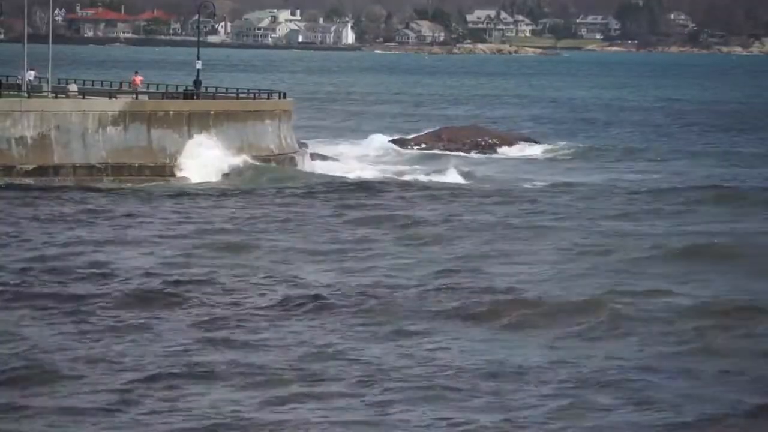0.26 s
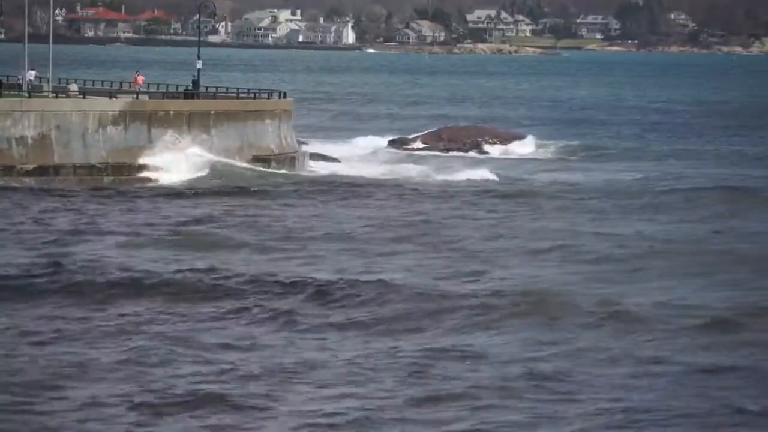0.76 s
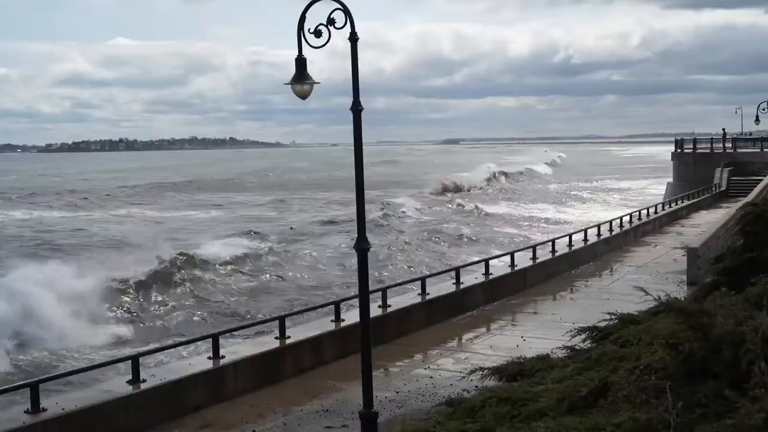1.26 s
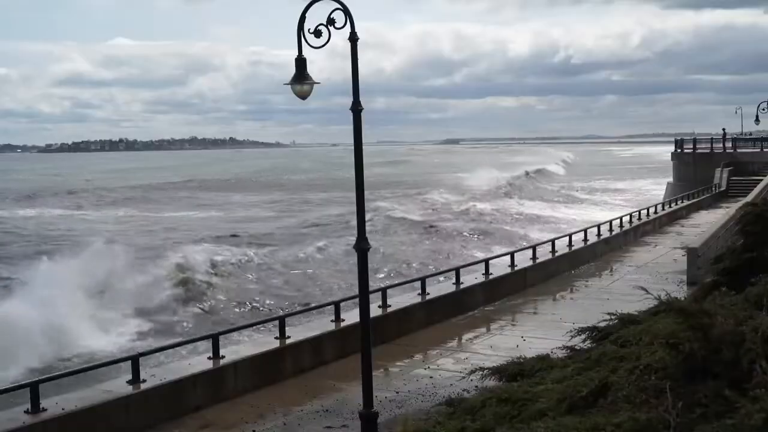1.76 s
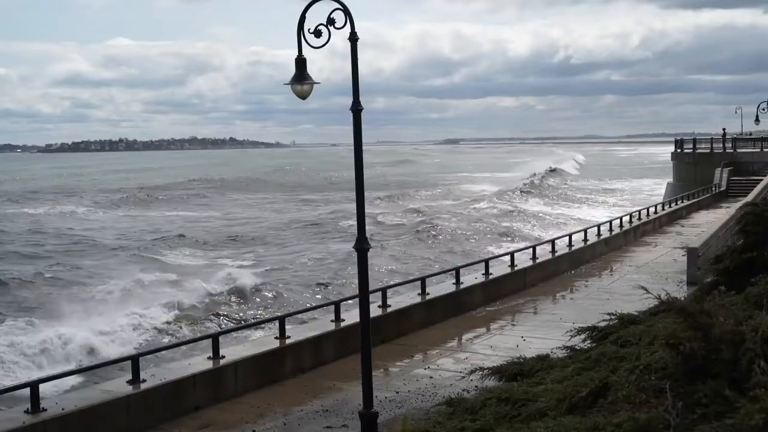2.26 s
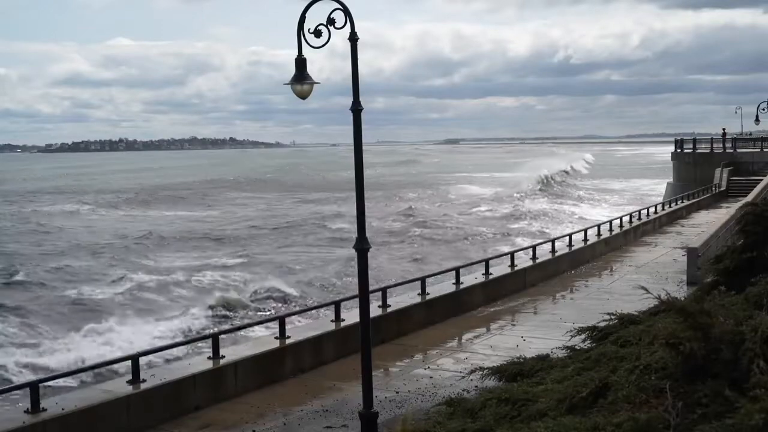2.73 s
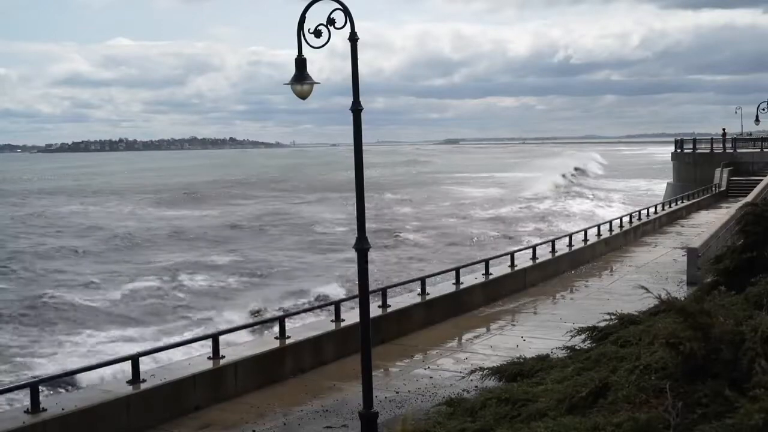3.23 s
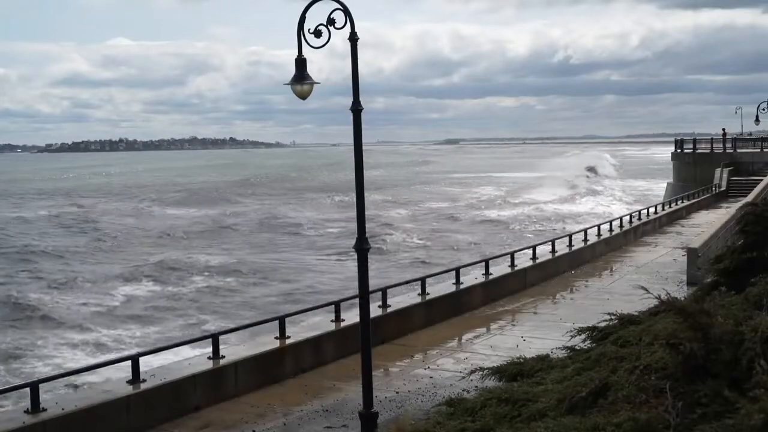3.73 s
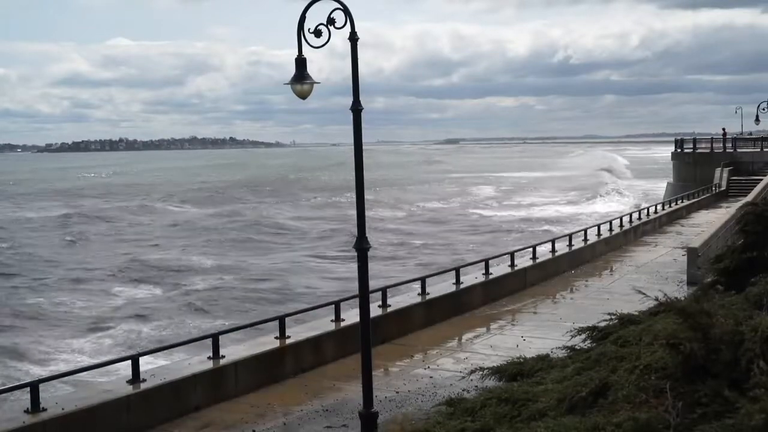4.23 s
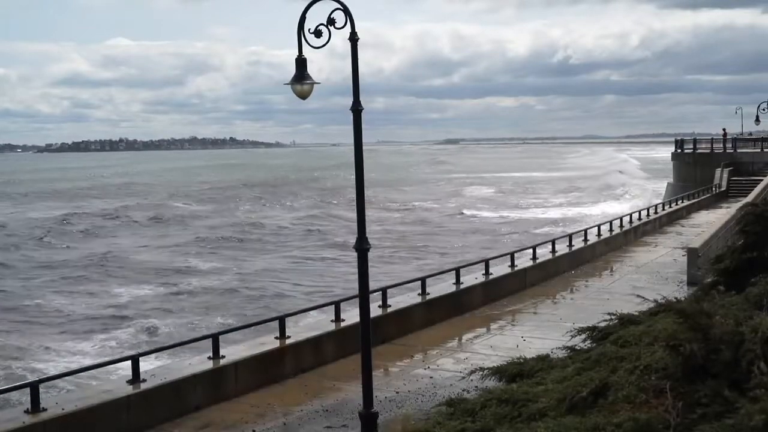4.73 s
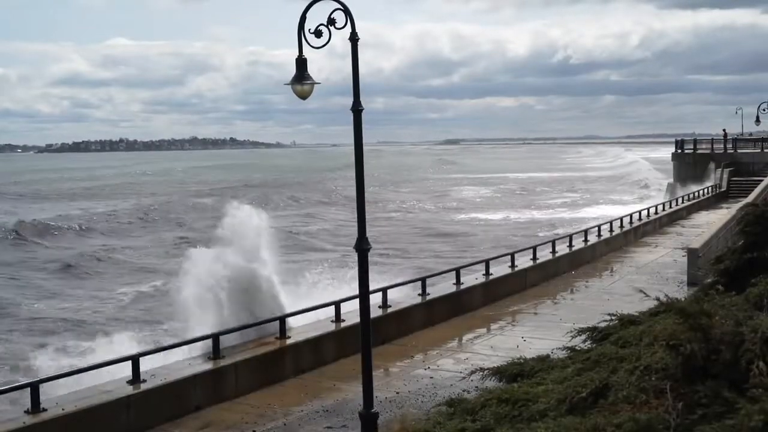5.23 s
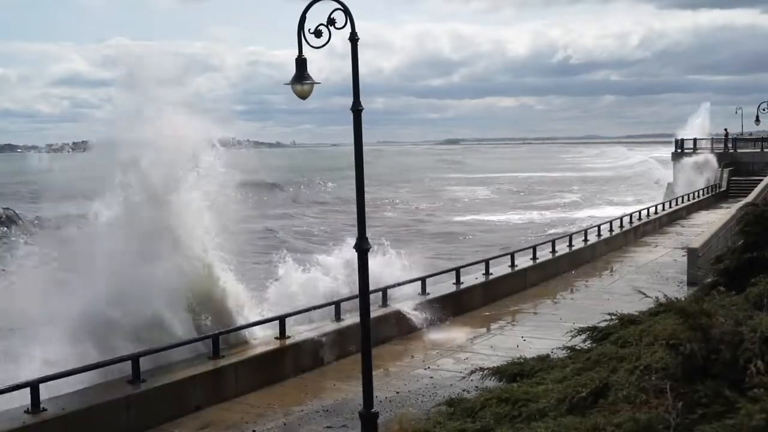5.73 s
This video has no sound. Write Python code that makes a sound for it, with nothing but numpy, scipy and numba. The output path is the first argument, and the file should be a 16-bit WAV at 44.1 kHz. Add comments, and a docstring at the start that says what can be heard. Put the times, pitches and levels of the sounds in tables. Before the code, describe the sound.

Distant breakers give way abruptly to close waves slamming a sea wall and washing back, with wind thumping on the microphone.

```python
"""Storm surf on a concrete sea wall, heard first from far off, then abruptly from beside the wall,
where a wave bursts, rains back and drains before the next one hits. Clouds of trapped air roar,
foam fizzes and spray patters. A distant motor and tyres on the shore road hum behind the backwash.
Gusts buffet the microphone and drive its limiter, so the sea ducks under the biggest swings."""
import sys
import numpy as np
from scipy import signal
from scipy.fft import rfft, irfft, next_fast_len
from scipy.io import wavfile
from scipy.ndimage import uniform_filter1d, map_coordinates
from numba import njit

SR = 44100
rng = np.random.default_rng(int(sys.argv[2]) if len(sys.argv) > 2 else 0)


def store_wav(level_fs):
    """Save 16-bit WAV to argv[1]."""
    pcm = np.round(np.clip(np.atleast_2d(level_fs), -1, 1) * 32767)
    wavfile.write(sys.argv[1], SR, pcm.T.astype(np.int16))


N = 264159
TIME = np.arange(N) / SR

# The four voices of white water, low to high. Each row: frequency in Hz, relative level in dB.
ROAR_SPECTRUM = [(120, -12), (280, -3), (500, 4), (750, 0), (1100, -8.5), (1600, -11.5), (2500, -18.5),
                 (5000, -79)]
FOAM_SPECTRUM = [(400, -5), (1000, 4.5), (1700, -1), (2500, 0), (3500, -2.5), (4500, -9), (6500, -19),
                 (12000, -29)]
SPRAY_SPECTRUM = [(2500, -2.5), (4500, 1.5), (6500, 0.5), (9500, -4), (12500, -13), (16000, -31)]
MIST_SPECTRUM = [(5000, -22), (9000, -1), (12000, -1.5), (14000, 0), (16000, -12)]

def surf():
    """Air trapped by the breakers roars; foam fizzes as it bursts; thrown spray hisses back down."""
    roar_db, foam_db = wash_db("roar"), wash_db("foam")
    spray_db = wash_db("spray", fall_s=0.24)  # spray settles sooner than foam
    slosh = walk(21.55)  # sheets of water land unevenly and move roar, foam and spray together
    roar = noise() + 0.62 * bubbles(200, 2223, cycles=12.6, spread_db=1.5, count=7000)
    roar = colour(roar, ROAR_SPECTRUM)
    foam = noise() + 0.42 * bubbles(810, 6720, cycles=12, spread_db=2, count=24000)
    foam = colour(foam, FOAM_SPECTRUM)
    spray = noise() + 0.5 * bubbles(4600, 11800, cycles=5.1, spread_db=-1, count=26000)
    spray = colour(spray, SPRAY_SPECTRUM)
    # the finest hiss only carries when the spray is dense and near
    mist_db = spray_db - 11.5 + np.interp(spray_db, [-60, -46.5], [-9, 0])
    return (roar * undb(roar_db + 0.18 * slosh + 0.31 * walk(35))
            + foam * undb(foam_db + 0.34 * slosh + 0.4 * walk(60))
            + spray * undb(spray_db + 0.31 * slosh + 0.38 * walk(80))
            + colour(noise(), MIST_SPECTRUM) * undb(mist_db))


# One far breaker, then the surges of two waves at the wall. Each row: time of full strength,
# hold and rise in seconds, then the levels of roar, foam and spray in dB.
SURGES = [(0.49, 0.79, .4, -37, -43.5, -54.5), (1.286, 0.42, .05, -35, -32, -45.5),
          (1.957, 0.34, 0.22, -32, -28.5, -39), (2.25, 0.36, .1, -37.5, -35.5, -45),
          (2.89, 0.69, 0.3, -33, -38.5, -51.5), (3.756, 0.13, .1, -38, -42, -66),
          (4.573, 0.11, .06, -35.5, -40, -59.5), (4.93, 0.11, .05, -37, -41.5, -65),
          (5.25, 0.26, 0.091, -40.5, -41.5, -48.5), (5.966, .1, 0.18, -56, -42, -44.5)]
FAR_WASH_DB, NEAR_WASH_DB = (-37, -46, -54.5), (-37, -42, -59)  # steady roar, foam, spray
CLOSE_S = 1.289  # from here on the microphone is beside the wall

def wash_db(layer, fall_s=0.28):
    """Level of one layer of surf: the surges in earshot swell and die away over a steady wash."""
    column = ("roar", "foam", "spray").index(layer)
    surges = [(start, hold, rise, levels[column]) for start, hold, rise, *levels in SURGES]
    far = summed_db(FAR_WASH_DB[column], surges[:1], fall_s)
    near = summed_db(NEAR_WASH_DB[column], surges[1:], fall_s)
    return np.where(TIME < CLOSE_S, far, near)


# Slabs of water landing on the wall, close by.
# Each row: start in seconds, level in dB, pitch of the trapped air in Hz, decay in seconds.
SLAMS = [(1.291, -20.5, 426, 0.043), (1.925, -22, 169, 0.038), (2.17, -28, 487, 0.096),
         (2.25, -26.5, 460, 0.079), (4.9, -29.5, 844, 0.076)]

def slams():
    """A falling slab traps a pocket of air, which booms briefly."""
    out = np.zeros(N)
    for start, db, hz, decay in SLAMS:
        age = np.maximum(TIME - start, 0)
        pocket = unit(resonate(resonate(noise(), hz, 0.75 * hz), hz, hz))
        attack = 1 - np.exp(-age / 0.0047)
        out += undb(db) * pocket * attack * np.exp(-age / decay)
    return out


# The low end of the sea at the wall. Each row: frequency in Hz, relative level in dB.
RUMBLE_SPECTRUM = [(25, -19), (50, -5.5), (78, 5), (110, 0.5), (170, 0), (250, -3), (400, -12.5),
                   (900, -53)]

def swell():
    """The mass of water heaving against the wall rumbles, more as the breakers roar."""
    excess_roar_db = wash_db("roar") + 32
    return colour(noise(), RUMBLE_SPECTRUM) * undb(-28.5 + 0.39 * excess_roar_db)


# Two faint, bright ticks, then a sharp click where the sound cuts abruptly to beside the wall.
# Each row: start in seconds, peak level in dB, pitch in Hz, bandwidth in Hz.
TICKS = [(.629, -35, 9500, 4000), (0.936, -34, 6500, 4000), (1.29, -16.5, 3960, 10100)]

def ticks():
    """Each is one short, bright burst of noise."""
    out = np.zeros(N)
    for start, db, hz, width in TICKS:
        age = np.maximum(TIME - start, 0)
        burst = noise() * (age > 0) * np.exp(-age / 0.00076)
        tick = resonate(resonate(burst, hz, width), hz, width)
        out += undb(db) * tick / np.abs(tick).max()
    return out


# Wind on the microphone itself. Each row: frequency in Hz, relative level in dB.
BUFFET_SPECTRUM = [(8, -11), (20, 2), (35, -1), (60, -7), (90, -18), (140, -26.5), (250, -33), (500, -51.5),
                   (1500, -114)]
# Each row: time of full strength in seconds, hold in seconds, buffeting in dB, fast flutter in dB.
GUSTS = [(0.142, 0.14, -17, -48), (0.453, 0.33, -19, -42), (.94, 0.072, -18.5, -41),
         (1.122, 0.26, -22.5, -38), (3.036, 0.51, -23.5, -44), (3.704, .2, -11, -44), (3.971, .24, -8, -37),
         (4.338, 0.12, -11.5, -44), (4.557, 0.13, -16.5, -44), (4.795, 0.19, -10.5, -32),
         (5.062, 0.43, -11.5, -17), (5.618, 0.18, -6.5, -12), (5.88, 0.074, -9.5, -35)]
# Single thumps on the diaphragm. Each row: centre in seconds, peak level in dB, half-width in seconds.
EDDIES = [(0.131, -8.5, 0.0071), (0.486, -5, 0.012), (0.639, -6, 0.013), (0.765, -4.5, 0.0071),
          (3.812, -6, 0.0061), (4.129, 1.5, 0.0079), (4.827, -3, 0.0065), (5.059, 2.5, 0.0056),
          (5.279, 1, 0.0064), (5.322, 2.5, 0.007), (5.368, 0.5, 0.0082), (5.648, 3.5, 0.0069)]
GUST_RISE_S, GUST_FALL_S = 0.044, 0.04
BREEZE_DB, BREEZE_FLUTTER_DB = -29.5, -36.5  # between the gusts

def wind():
    """Turbulence pushes the diaphragm; an eddy is one pressure swing with a rebound on each side."""
    buffets = [(start, hold, GUST_RISE_S, db) for start, hold, db, _ in GUSTS]
    flutters = [(start, hold, GUST_RISE_S, db) for start, hold, _, db in GUSTS]
    buffet = steady(colour(noise(), BUFFET_SPECTRUM))
    flutter_spectrum = [(30, -36), (65, 6.5), (100, -2), (160, -10), (280, -26.5), (700, -68)]
    flutter = steady(colour(noise(), flutter_spectrum))
    out = buffet * undb(summed_db(BREEZE_DB, buffets, GUST_FALL_S))
    out += flutter * undb(summed_db(BREEZE_FLUTTER_DB, flutters, GUST_FALL_S))
    for centre, db, half_width in EDDIES:
        offset = (TIME - centre) / half_width
        core = np.exp(-offset ** 2 / 2)
        out = out * (1 - core) + undb(db) * (1 - offset ** 2) * core
    return out


MOTOR_HZ, MOTOR_DB = 120.5, -32
CAR_DB, ROAD_DB = -33, -43.5  # one passing car, and other tyres ahead of it

def traffic():
    """A far motor drones on one slightly wandering note while tyres sing on the shore road."""
    motor_hz = MOTOR_HZ * (1 + 0.0051 * walk(6.5))
    phase = 2 * np.pi * np.cumsum(motor_hz) / SR
    motor = unit(np.sin(phase) + undb(-19.5) * np.sin(2 * phase))
    drone = undb(MOTOR_DB) * envelope(2.15, hold=3.7, rise=0.058, fall=0.7)
    tread = colour(noise(), [(500, -12), (820, -6.5), (950, -1), (1080, -2.5),
                             (1230, -10.5), (1550, -10.5), (2100, -17.5), (4000, -42)])
    arrival_s = 3.51
    car = undb(CAR_DB) * envelope(arrival_s, hold=1.18, rise=0.51, fall=0.21)
    road = undb(ROAD_DB) * (TIME < arrival_s)
    return motor * drone * undb(1.8 * walk(19)) + tread * np.maximum(car, road)


def bubbles(low_hz, high_hz, cycles, spread_db, count):
    """Bubbles born at random with uneven strengths; small ones ring higher and shorter."""
    when, pitch, life, strength = rng.random((count, 4)).T
    hz = low_hz * (high_hz / low_hz) ** pitch
    gain = undb(-spread_db * np.log(1 - 0.995 * strength)) * hz ** 1.5
    starts = (when * N).astype(np.int64)
    return unit(ring(starts, hz, cycles * (0.5 + life), gain, glide=0.2))


@njit
def ring(start, hz, cycles, gain, glide):
    """A sum of dying sines; each rises in pitch by the share `glide` while it lasts."""
    out = np.zeros(N)
    for k in range(len(start)):
        length = int(cycles[k] * SR / hz[k]) + 2
        step = np.exp(2j * np.pi * hz[k] / SR - 5 / length)
        bend = np.exp(2j * np.pi * hz[k] / SR * glide / length)
        phasor = gain[k] + 0j
        for i in range(start[k], min(start[k] + length, N)):
            out[i] += phasor.imag
            phasor *= step
            step *= bend
    return out


def envelope(start, hold, rise, fall):
    """Exponential rise to 1 at `start`, a hold, an exponential fall; all in seconds."""
    return np.exp(np.minimum(TIME - start, 0) / rise - np.maximum(TIME - start - hold, 0) / fall)


def summed_db(floor_db, events, fall):
    """Level of (start, hold, rise, dB) events over a floor; their powers add."""
    power = sum((undb(db) * envelope(start, hold, rise, fall)) ** 2 for start, hold, rise, db in events)
    return 10 * np.log10(undb(floor_db) ** 2 + power)


def colour(x, points):
    """Filter by a curve of (Hz, dB) points, falling away above the last one; rms 1."""
    hz, db = np.transpose(points)
    size = next_fast_len(N)
    freq = np.maximum(np.fft.rfftfreq(size, 1 / SR), 1)
    gain = undb(np.interp(np.log(freq), np.log(hz), db)) / np.maximum(freq / hz[-1], 1) ** 2
    return unit(irfft(rfft(x, size) * gain, size)[:N])


def resonate(x, hz, width_hz):
    """One resonance, gain 1 at its centre."""
    return signal.lfilter(*signal.iirpeak(hz, hz / width_hz, fs=SR), x)


def noise():
    """White noise."""
    return rng.standard_normal(N)


def walk(rate):
    """Smooth chance that changes `rate` times a second; spread near 1."""
    knots = rng.standard_normal(2048)
    return 1.1 * map_coordinates(knots, [TIME * rate], order=3, mode="wrap")


def undb(db):
    """Decibels to gain."""
    return 10 ** (np.asarray(db) / 20)


def unit(x):
    """Scale to rms 1."""
    return x / np.sqrt(np.mean(x ** 2))


def steady(x):
    """Hold the running rms near 1, so that an envelope alone sets the strength."""
    return x / np.sqrt(uniform_filter1d(x ** 2, size=3500))


@njit
def follow(x, attack_s, release_s):
    """Peak follower: rises quickly, lets go slowly."""
    out, level = np.empty(len(x)), 0.0
    for i in range(len(x)):
        gap = abs(x[i]) - level
        level += gap / (SR * (attack_s if gap > 0 else release_s))
        out[i] = level
    return out


def scene():
    """Sea, traffic and wind at one microphone on the shore."""
    return (surf() + slams() + swell() + ticks() + traffic() + wind())[None]


# The microphone's body rings near 3 kHz. Each row: frequency in Hz, bandwidth in Hz, level in dB.
MIC_RESONANCES = [(2980, 390, -5), (3290, 280, -2.5)]
THRESHOLD, CEILING, TOP_HZ = 0.71, 0.7, 15720  # threshold and ceiling as shares of full scale

def record(dry):
    """The microphone rings, a limiter ducks under big swings, and the highest treble is cut."""
    mic = dry + sum(undb(db) * resonate(dry, hz, width) for hz, width, db in MIC_RESONANCES)
    peak = follow(mic[0], attack_s=0.001, release_s=0.046)
    limited = mic * uniform_filter1d(THRESHOLD / np.maximum(peak, THRESHOLD), size=32)
    clipped = limited / (1 + (limited / CEILING) ** 10) ** (1 / 10)  # overshoots are flattened
    return signal.sosfilt(signal.ellip(10, 0.1, 80, TOP_HZ, fs=SR, output="sos"), clipped)


dry = scene()
out = record(dry)
store_wav(out)
```